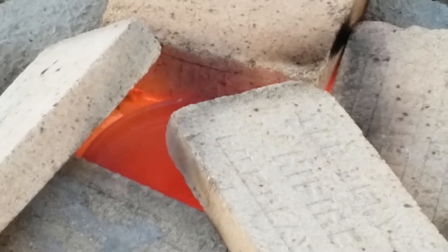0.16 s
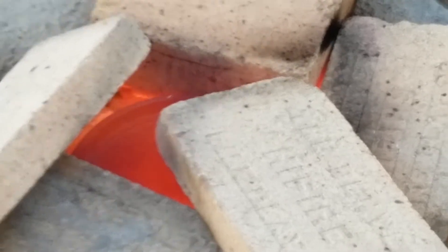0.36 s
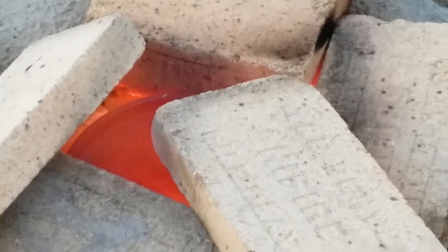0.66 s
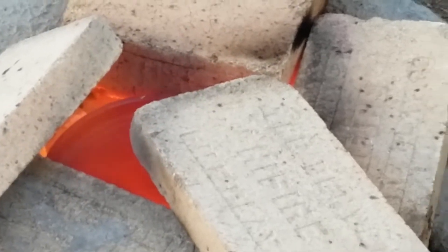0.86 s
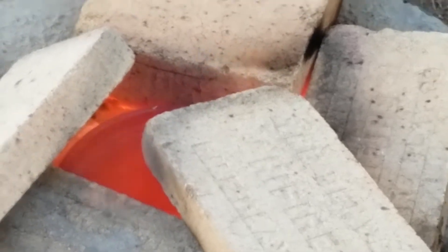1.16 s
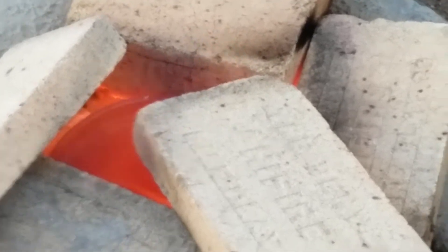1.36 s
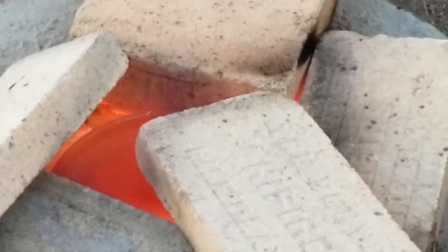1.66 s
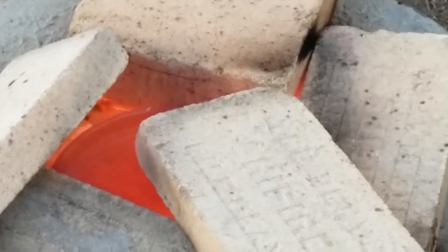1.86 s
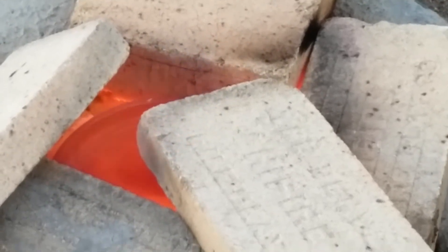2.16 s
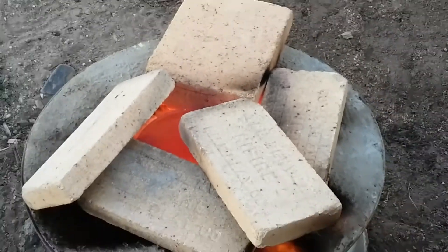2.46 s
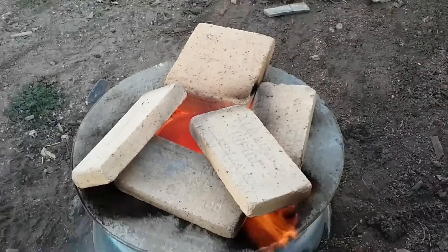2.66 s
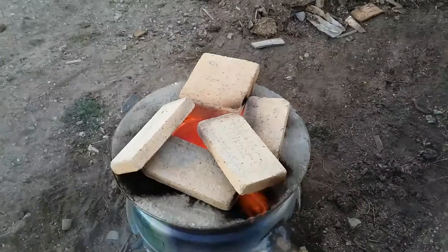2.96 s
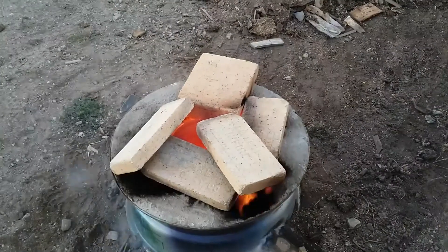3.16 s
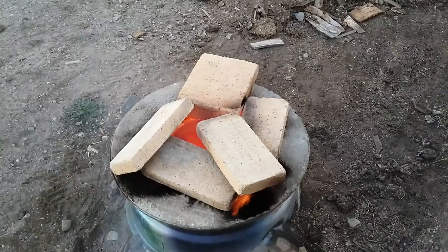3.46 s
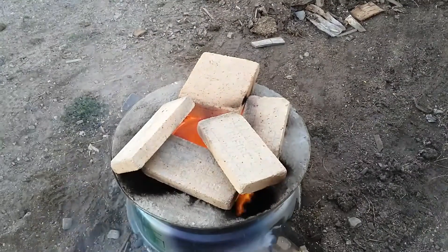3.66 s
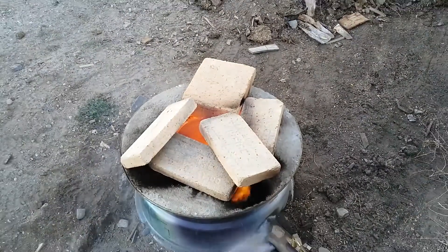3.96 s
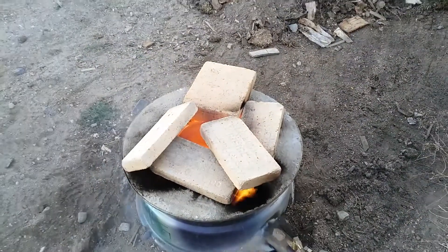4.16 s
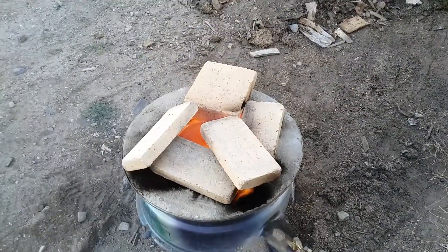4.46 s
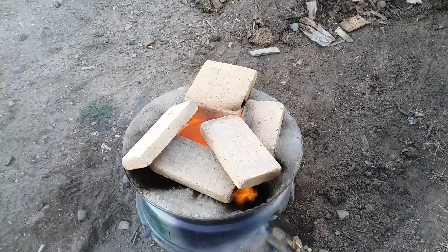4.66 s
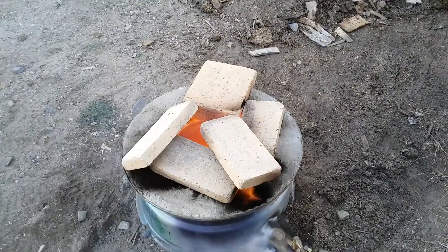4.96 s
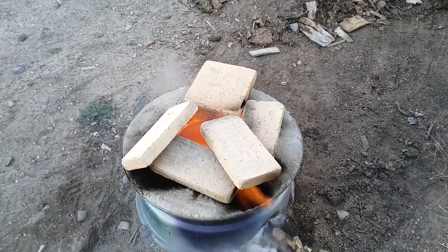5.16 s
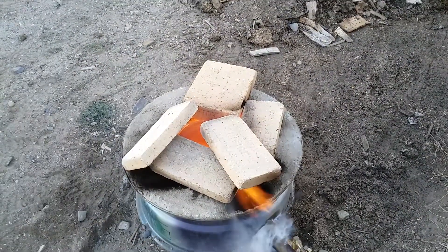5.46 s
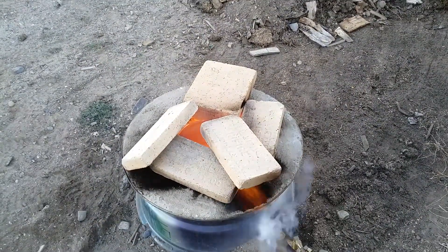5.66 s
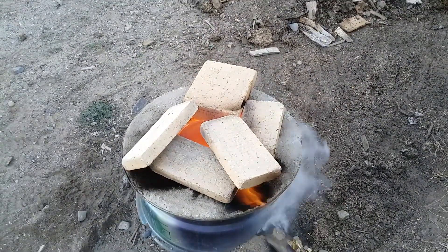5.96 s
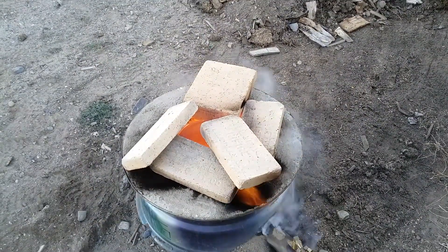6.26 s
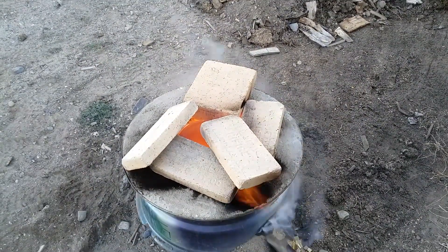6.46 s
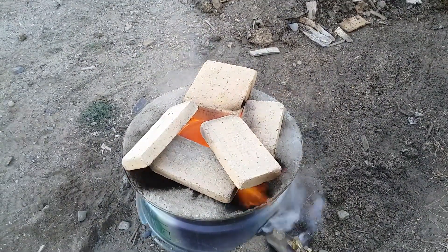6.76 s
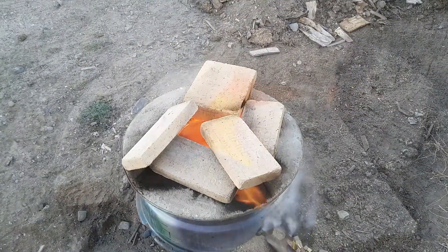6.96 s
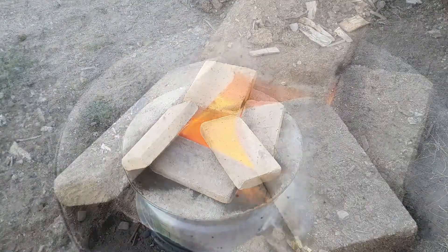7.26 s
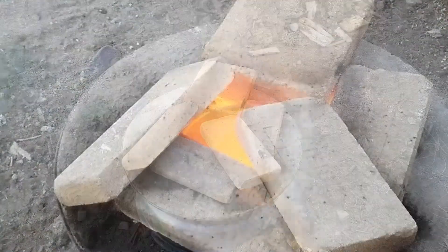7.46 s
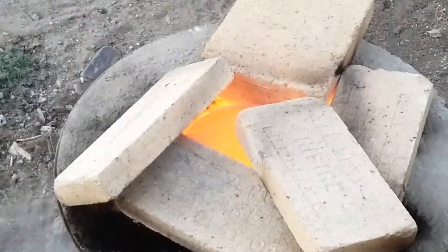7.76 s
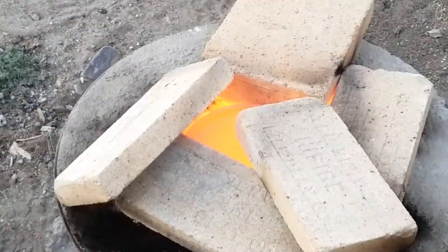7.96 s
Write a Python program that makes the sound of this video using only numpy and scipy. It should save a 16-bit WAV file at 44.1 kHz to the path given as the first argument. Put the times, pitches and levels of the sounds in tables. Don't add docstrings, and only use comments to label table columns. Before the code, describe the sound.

A blower-fed oil burner roars steadily in a small drum furnace outdoors, low rumble under faint airy rush, with a click late on.

```python
import sys
import numpy as np
from scipy import signal
from scipy.io import wavfile
from scipy.ndimage import uniform_filter1d, minimum_filter1d

SR = 44100
rng = np.random.default_rng(int(sys.argv[2]) if len(sys.argv) > 2 else 0)


def wrap_up_sound(samples):
    columns = np.atleast_2d(samples).T
    tamed = np.clip(columns, -1, 1)
    steps = np.round(tamed * 32767).astype(np.int16)
    wavfile.write(sys.argv[1], SR, steps)


def nominal_scale(level):
    x = np.asarray(level, float) / 20
    return 10 ** x


N = 357651
SCENE_CHANGE_S = 7.29685


def evened(x):
    return x / np.sqrt(np.mean(x ** 2) + 1e-20)


def column(rows, k, t):
    rows = np.array(rows)
    return np.interp(t, rows[:, 0], rows[:, k])


def bumps(events, t):
    return sum(db * np.exp(-(2 * (t - s) / length) ** 2) for s, length, db in events)


def wander(low_hz, high_hz):
    t = np.arange(0, N + 64, 64) / SR
    slow = 0
    for f in np.geomspace(low_hz, high_hz, num=60):
        slow = slow + np.sin(2 * np.pi * (f * t + rng.random())) / np.sqrt(f)
    return np.interp(np.arange(N) / SR, t, evened(slow))


# t/s, distance (0 near - 1 far)
DISTANCE = [
    (0, 0.054),
    (1.6, 0.038),
    (1.75, 0.21),
    (3, 0.47),
    (3.3, 0.36),
    (4.3, 0.36),
    (5.0, 0.61),
    (5.15, 0.89),
    (6.0, 1),
    (7.2, 0.98),
]
# t/s, aim (0 facing - 1 away)
AIM_AWAY = [(0, 0.1), (0.7, 0), (1.3, 0.15), (1.6, 0.026), (1.65, 0.47), (1.8, 0.58), (2.2, 1),
            (2.75, 0.94), (3.25, 0), (4.2, 0), (4.45, 0.17), (5.5, 0.031), (7.2, 0.12)]


def heard_db(levels, t):
    near_db, away_db, far_db, changed_db = levels
    moving_db = near_db + away_db * column(AIM_AWAY, 1, t) + far_db * column(DISTANCE, 1, t)
    return np.where(t < SCENE_CHANGE_S, moving_db, changed_db)


def turbulence(shape, modes, parts, patchy_db, streaky_db):
    size, hop = 4096, 1024
    hz = np.fft.rfftfreq(size, 1 / SR)
    t = np.arange(N // hop + 10) * hop / SR
    far = np.clip(column(DISTANCE, 1, t), 0, 1)
    f, db = np.transpose(shape)
    smooth_db = np.interp(np.log(hz + 1), np.log(f), db, left=-90, right=-90)
    field = smooth_db[:, None] + 0 * t
    for centre, width, near_db, far_db, changed_db in modes:
        resonance = 1 / (1 + (2 * (hz - centre) / width) ** 2)
        gain_db = np.where(t < SCENE_CHANGE_S, near_db + (far_db - near_db) * far, changed_db)
        field += np.outer(resonance, gain_db)
    a, b, patches, streaks = rng.standard_normal((len(t), len(hz), 4)).T
    patches = uniform_filter1d(patches, size=32, axis=0)
    patches = evened(uniform_filter1d(patches, size=3, axis=1))
    streaks = uniform_filter1d(streaks, size=6, axis=0)
    streaks = evened(uniform_filter1d(streaks, size=30, axis=1))
    z = (a + 1j * b) * nominal_scale(field + patchy_db * patches + streaky_db * streaks)
    out = 0
    for low, high, level_db in parts:
        above = np.clip((hz - low) / (0.11 * low + 1) + 0.5, 0, 1)
        below = np.clip((high - hz) / (0.094 * high + 1) + 0.5, 0, 1)
        share = (above * below)[:, None]
        part = z * share / np.sqrt((nominal_scale(field) ** 2 * share).sum(0))
        noise = signal.istft(part, nperseg=size, noverlap=size - hop)[1][:N]
        out = out + evened(noise) * nominal_scale(level_db)
    return out


# t/s, length/s, change/dB
DRAUGHT = [(0.1, 0.11, -2), (0.3, .15, 1), (1.02, 0.1, 2), (1.17, .06, -3), (1.47, 0.066, -3),
           (1.55, .07, -2.5), (1.64, 0.14, -3), (1.92, .2, 2), (3.2, 0.2, 1.5), (3.36, 0.12, -3.5),
           (4.39, .08, -0.5), (4.54, .05, 2), (4.82, 0.13, 1), (5.01, .1, -2), (5.31, .05, -2),
           (6.03, 0.14, 0), (6.75, .2, 0.5), (7.05, .2, -0.5), (7.25, 0.11, -2), (7.39, .1, -0.5),
           (7.7, 0.088, 1.5), (8.0, .15, -0.5)]


def draught_db(t):
    return bumps(DRAUGHT, t)


# f/Hz, level/dB per Hz
FLAME_SHAPE = [(14, -30), (36, -31), (48, -24), (62, -11.5), (100, -2.5), (150, 0), (300, -4.5),
               (500, -9.5), (600, -15), (850, -16.5), (930, -36), (1300, -38)]
# f/Hz, width/Hz, near/dB, far/dB, after scene change/dB
DRUM = [(132, 24, 0.5, 1, 2), (268, 15, 2, 3.5, -0.5), (288, 18.7, -7.5, -11.5, -18), (377, 77, 5.5, 6, 4),
        (448.7, 14, -2.5, -0.5, -15), (469.6, 26, 4, 6, 5.5), (713, 103, 4.5, 3, -1.5),
        (855, 17.5, 7, 1, -6)]
# t/s, length/s, change/dB
PUFFS = [(1.17, .2, -0.5), (1.4, 0.049, -1.5), (1.6, 0.055, 3.5), (1.74, .05, 0), (3.3, 0.6, 0.5),
         (3.73, 0.025, -2), (4.1, 0.23, 0.5), (4.6, .3, 0), (6.85, 0.18, 0.5), (7.32, .08, 1),
         (8.11, 0.11, -1.5)]
# near and facing/dB, change away/dB, change far/dB, after scene change/dB
RUMBLE, DRUM_RING = (-32, -4, -1.5, -34), (-36, -4, 1, -34.5)


def flame(t):
    puffs = bumps(PUFFS, t)
    parts = [(0, 301, heard_db(RUMBLE, t) + puffs),
             (305.3, 930, heard_db(DRUM_RING, t) + puffs)]
    return turbulence(FLAME_SHAPE, DRUM, parts, patchy_db=0.25, streaky_db=0.52)


# f/Hz, level/dB per Hz
EXHAUST_SHAPE = [(600, -19), (900, 0.5), (1200, -3), (1400, 1), (1900, -7), (2600, -6.5), (3200, -7),
                 (3500, -19), (4500, -30)]
# f/Hz, width/Hz, near/dB, far/dB, after scene change/dB
GAPS = [(999, 31, 8.5, 6.5, 10.5), (1074, 37, -3, -1, 2), (1200, 120, -4.5, 0.5, -0.5),
        (1288, 39, 2, 4.5, 6), (1410, 40, 0, 4.5, 6.5), (1550, 30, 4, 5.5, 2), (1594, 65, 0.5, 2, 2),
        (1700, 230, -2, 9.5, 2.5), (2040, 60, 6, -5, 3), (2400, 130, 5, 3.5, -4), (2610, 41, 5, 4.5, 0),
        (2630, 40, 3.5, 5, -2), (2630, 125, -3.5, -11.5, -1.5), (2910, 440, -4.5, 10, 7)]
# t/s, length/s, change/dB
LICKS = [
    (3.73, .015, 3),
    (4.55, .3, -2),
    (6.0, .15, 0),
    (7.07, .25, 2.5),
    (7.42, .15, -2),
    (8.05, .2, 0.5),
]
# near and facing/dB, change away/dB, change far/dB, after scene change/dB
RUSH_LOW, RUSH_MID, RUSH_HIGH = (-53.5, -4, 2.5, -51.5), (-60, -2, 3.5, -59.5), (-65, 1, 5, -65)


def exhaust(t, gusts, draught):
    low_follows, mid_follows, high_follows = 0.37, 0.61, 2
    flutter = 0.53 * gusts
    low_db = heard_db(RUSH_LOW, t) + low_follows * draught + bumps(LICKS, t) + flutter
    mid_db = heard_db(RUSH_MID, t) + mid_follows * draught + flutter
    high_db = heard_db(RUSH_HIGH, t) + high_follows * draught + flutter
    parts = [(600, 1900, low_db), (1900, 2650, mid_db), (2650, 4500, high_db)]
    return turbulence(EXHAUST_SHAPE, GAPS, parts, patchy_db=1.0, streaky_db=1.16)


# f/Hz, level/dB per Hz
JET_SHAPE = [(2500, -5), (3500, -1), (4900, -7.5), (6000, -6.5), (7600, -3), (9500, -10), (11500, -11),
             (12500, -15), (14000, -10), (15700, -14)]
# f/Hz, width/Hz, near/dB, far/dB, after scene
# change/dB
JET_MODES = [(4140, 740, 4, 6.5, 4), (4480, 80, -6, 4, 3), (5610, 120, 4, 1, -2), (6080, 180, -4, -9, -7),
             (6650, 250, 0.5, -3.5, 1), (7000, 170, -4, 2, 1), (6930, 89, -7, -7, -3), (7200, 120, -2, 1, 1),
             (7720, 170, -1, 5.5, 1), (7690, 130, 6, -2, 0), (8060, 93, -4, -6, -6), (8370, 80, -6, -10, -5)]
MORE_JET_MODES = [(8680, 170, 6, 2, 4), (9200, 90, 7, -16, -10), (9680, 190, 5.5, 6, 9), (10000, 120, -9, -4, -5),
                  (10400, 60, 2, -2, -4), (10450, 110, 5, 6, 7), (11030, 120, 4, 1, 3), (11600, 90, 2, -1, 1),
                  (13195, 100, 10, 10, 10), (13420, 80, -3, 0, -3), (13570, 110, 5, 6, 4), (14700, 250, -2, -8, -2),
                  (15100, 100, 2, 4, 1), (15600, 150, 5, 3, 2)]
# t/s, length/s, loss/dB
SHADOWS = [
    (1.624, .03, -8),
    (1.71, .13, -1.5),
    (1.672, .012, -3),
    (1.708, .016, -3),
    (1.99, .015, -2),
    (4.4, .03, -2.5),
]
# near and facing/dB, change away/dB, change far/dB, after scene change/dB
HISS_SKIRT, HISS_BODY, HISS_TOP = (-71.5, -3, 4, -69.5), (-64, -4, 0, -65), (-77, -5.5, -0.3, -77)


def jet(t, gusts, draught):
    db = 0.5 * gusts + 0.4 * wander(8, 70) + 0.35 * draught
    for s, length, loss_db in SHADOWS:
        db = db + loss_db * np.exp(-(2 * (t - s) / length) ** 4)
    parts = [(2500, 5200, heard_db(HISS_SKIRT, t) + db),
             (5200, 11500, heard_db(HISS_BODY, t) + db),
             (11500, 16500, heard_db(HISS_TOP, t) + db)]
    return turbulence(JET_SHAPE, [*JET_MODES, *MORE_JET_MODES], parts, patchy_db=1.3, streaky_db=1.6)


# t/s, peak level/dB, f/Hz
TICKS = [
    (0.3963, -56, 3950),
    (1.203, -58, 3900),
    (1.4344, -64, 4000),
    (3.1016, -59, 3900),
    (4.135, -60, 3900),
    (6.2484, -59, 3900),
]


def ticks(t):
    pop_s, fall_s, thud_db = 0.00045, 0.0018, 6
    out = np.zeros(N)
    u = np.arange(300) / SR
    for s, db, hz in TICKS:
        pop = np.sin(2 * np.pi * hz * u) * u / pop_s * np.exp(-u / pop_s)
        falling = np.sin(2 * np.pi * hz * fall_s * (1 - np.exp(-u / fall_s)))
        thud = falling * (u / fall_s) ** 2 * np.exp(-(u / fall_s) ** 2)
        out[round(s * SR):][:len(u)] += nominal_scale(db + 16.5) * (pop + nominal_scale(thud_db) * thud)
    return out


def scene():
    t = np.arange(N) / SR
    gusts = wander(7, 45)
    draught = draught_db(t)
    return (flame(t) + exhaust(t, gusts, draught) + jet(t, gusts, draught) + ticks(t))[None]


def scene_change_click():
    u = np.arange(N) / SR - SCENE_CHANGE_S
    jump = 0.056 / 2 * np.sign(u) * np.exp(-abs(u) / 0.0006)
    edge = signal.firwin(255, 15700, window=("kaiser", 9), fs=SR)
    return signal.oaconvolve(jump, edge, "same")


def roll_off(x):
    return signal.sosfilt(signal.butter(12, 15760, fs=SR, output="sos"), x)


def record(dry):
    heard = signal.sosfilt(signal.butter(2, 48, "high", fs=SR, output="sos"), dry)
    room = np.minimum(1, 0.09 / (abs(heard) + 1e-9))
    held = heard * uniform_filter1d(minimum_filter1d(room, size=661), size=661)
    held = held * np.sin(np.pi / 2 * np.minimum(np.arange(N)[::-1] / 120, 1)) ** 2
    mix = 1.056 * held + scene_change_click()
    return roll_off(mix)


dry = scene()
out = record(dry)
wrap_up_sound(out)
```